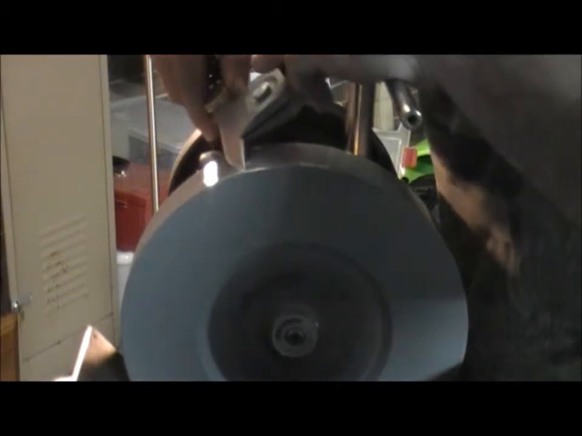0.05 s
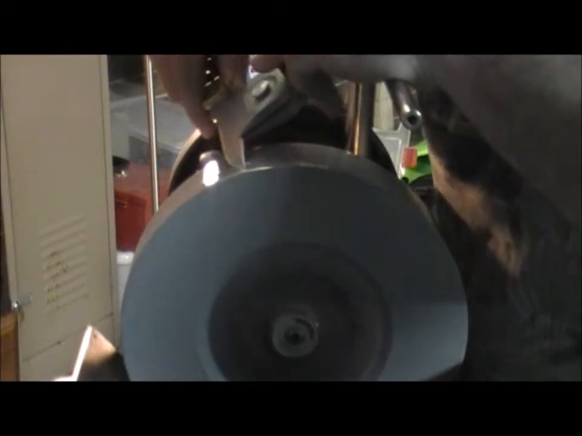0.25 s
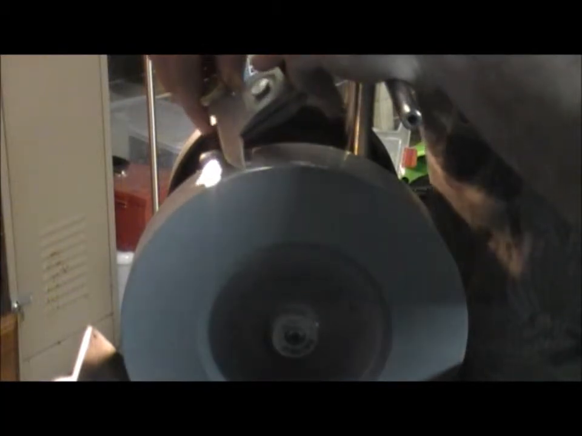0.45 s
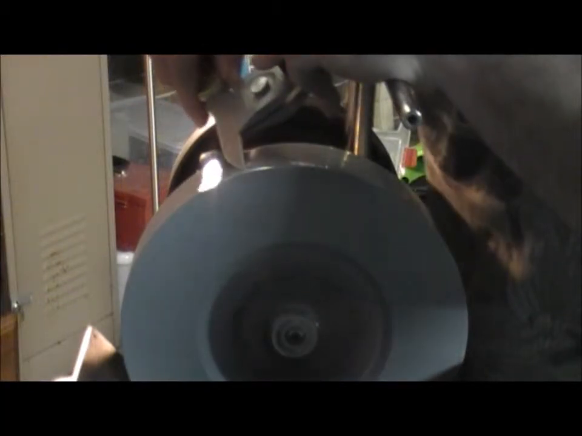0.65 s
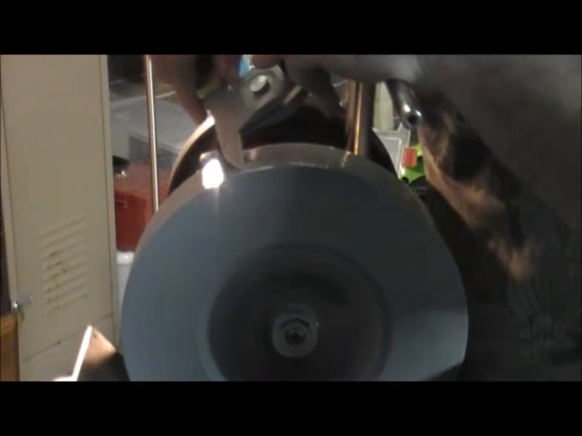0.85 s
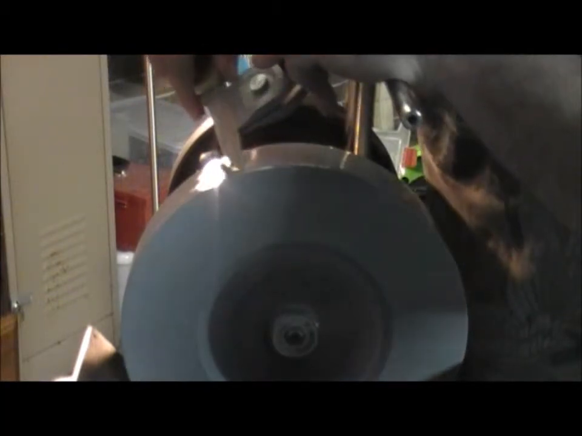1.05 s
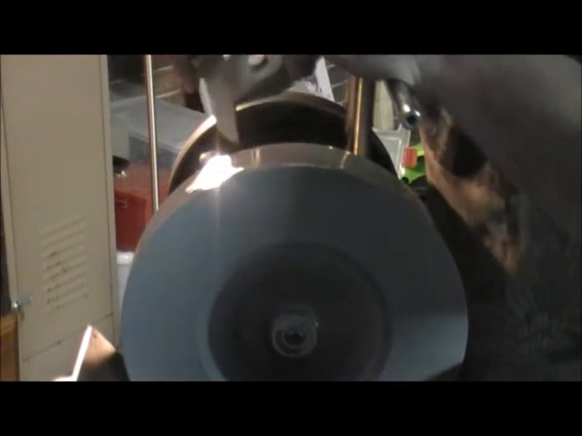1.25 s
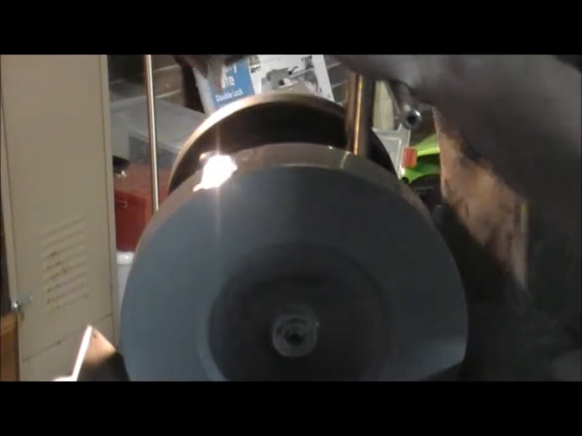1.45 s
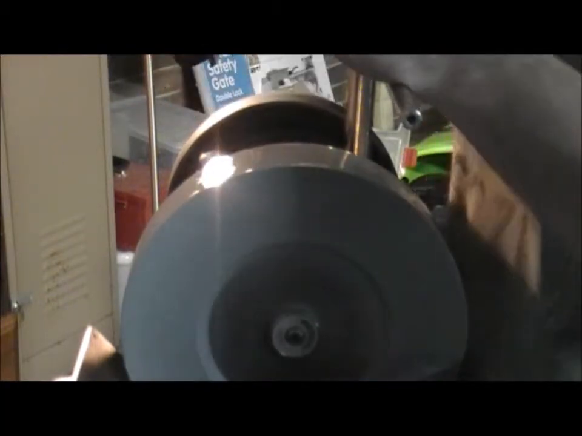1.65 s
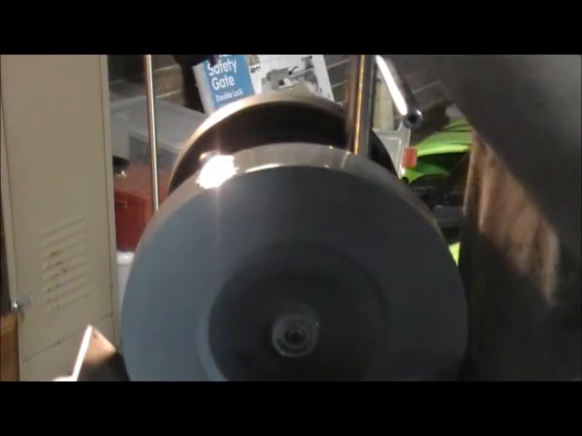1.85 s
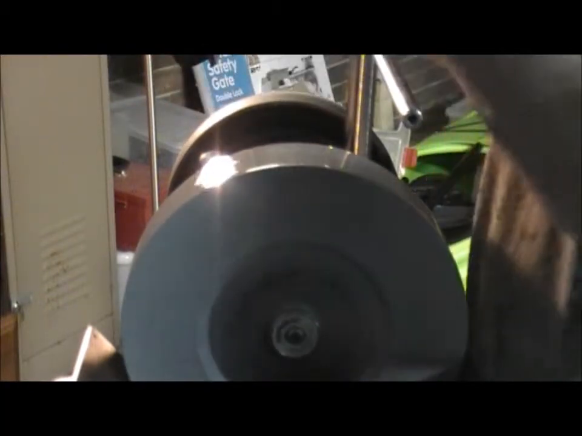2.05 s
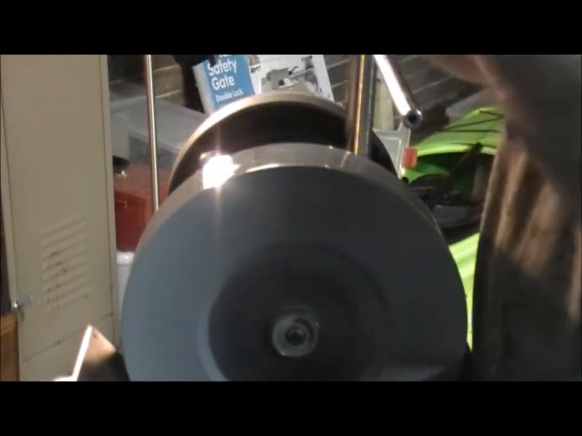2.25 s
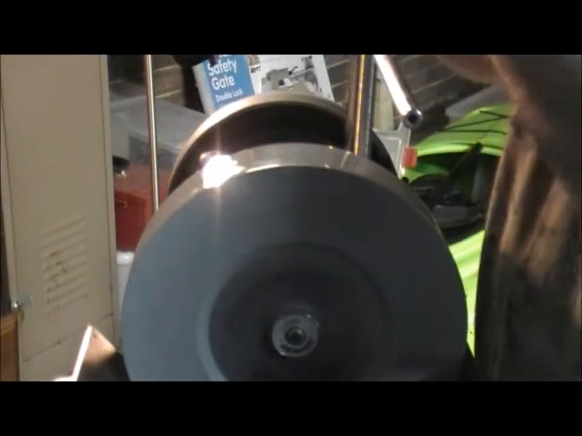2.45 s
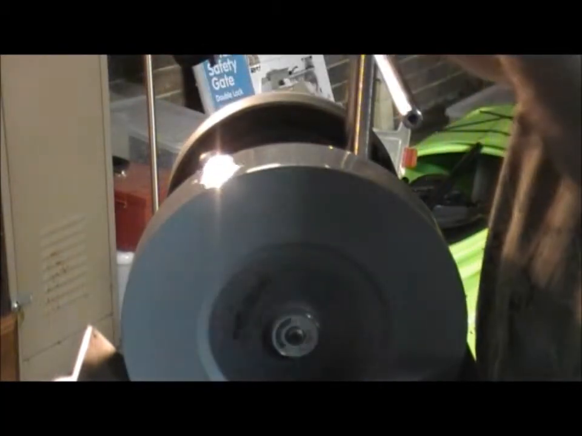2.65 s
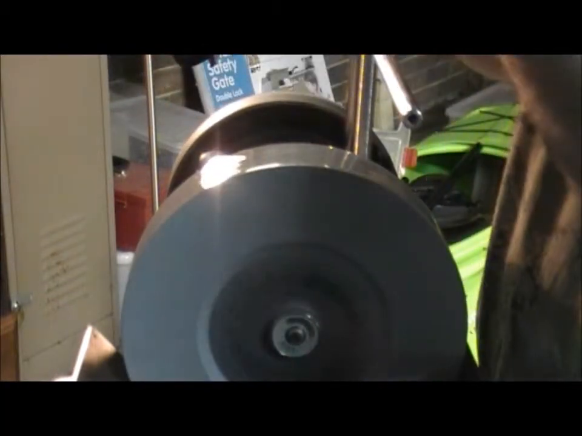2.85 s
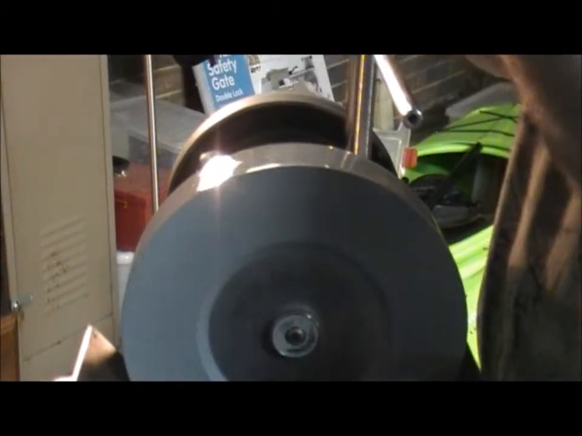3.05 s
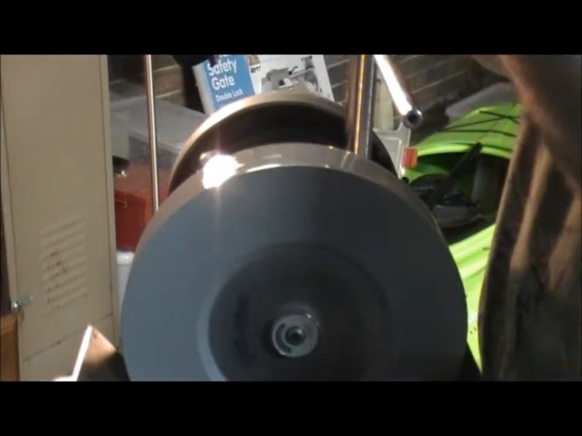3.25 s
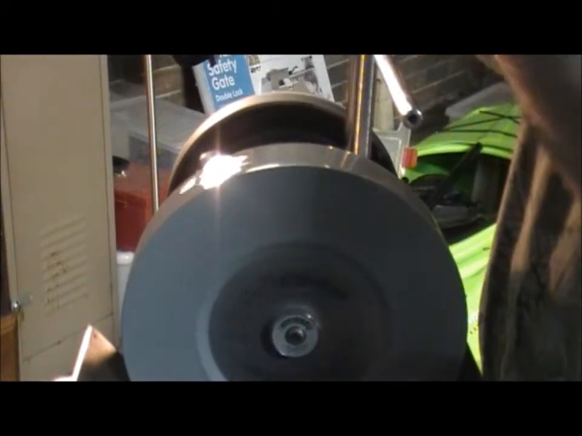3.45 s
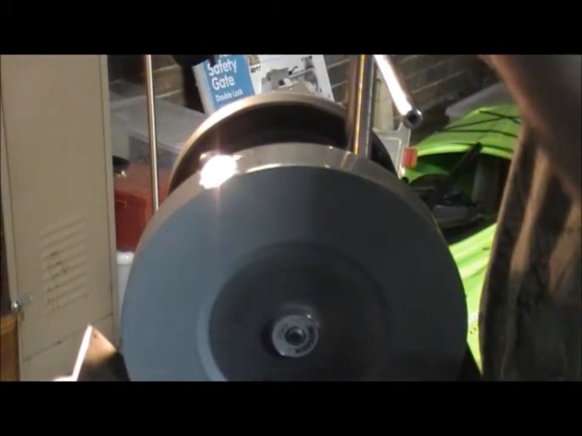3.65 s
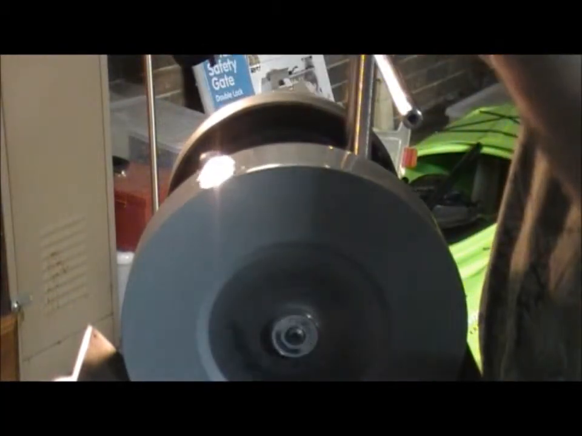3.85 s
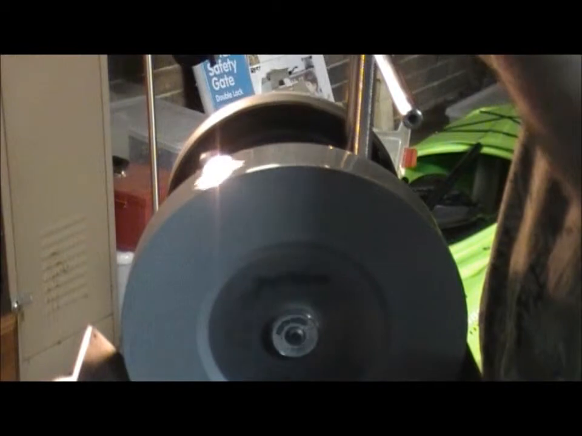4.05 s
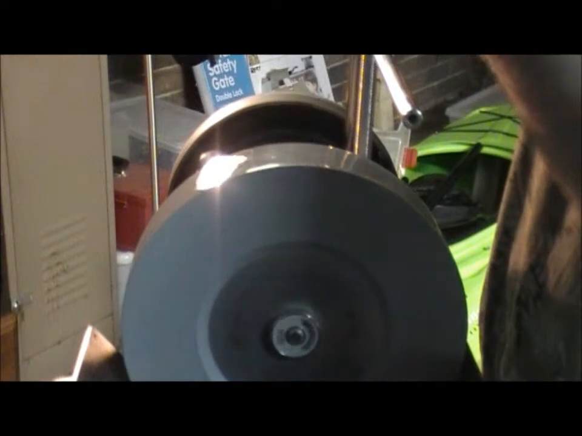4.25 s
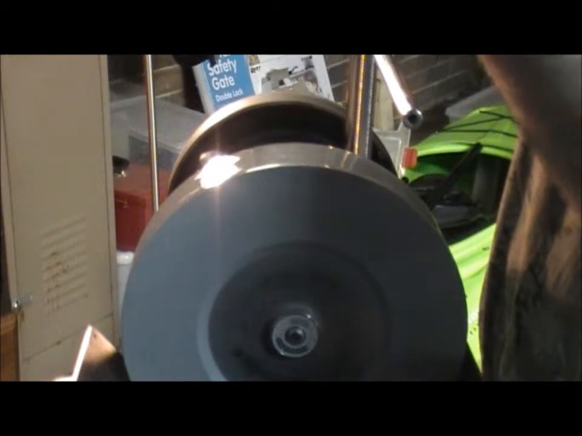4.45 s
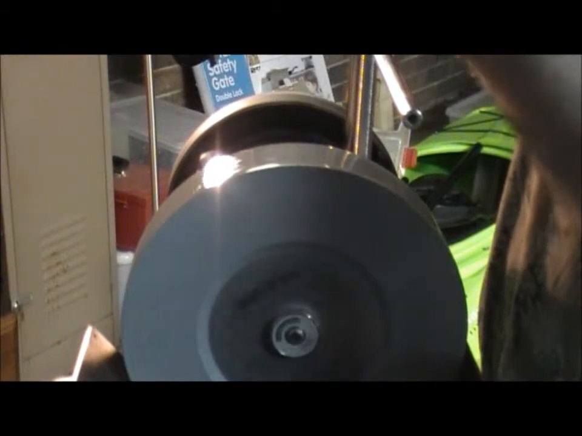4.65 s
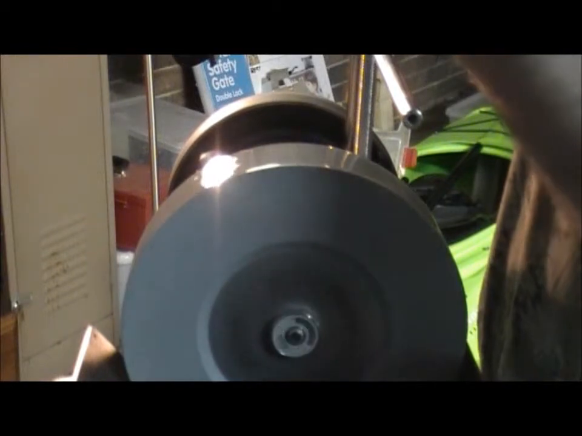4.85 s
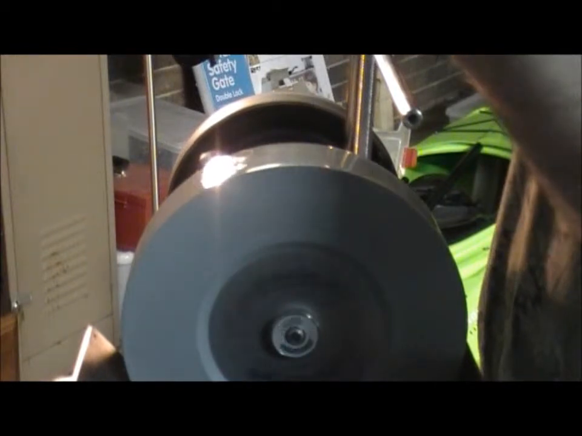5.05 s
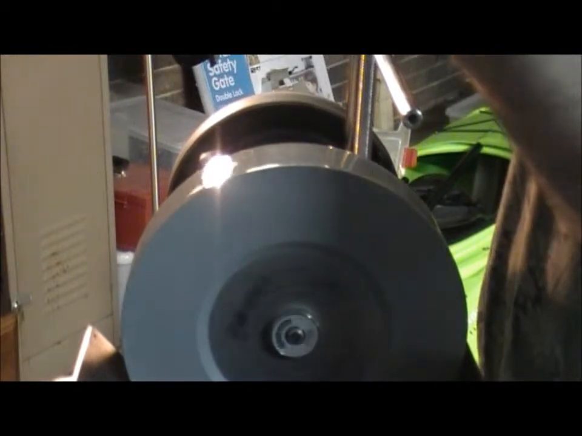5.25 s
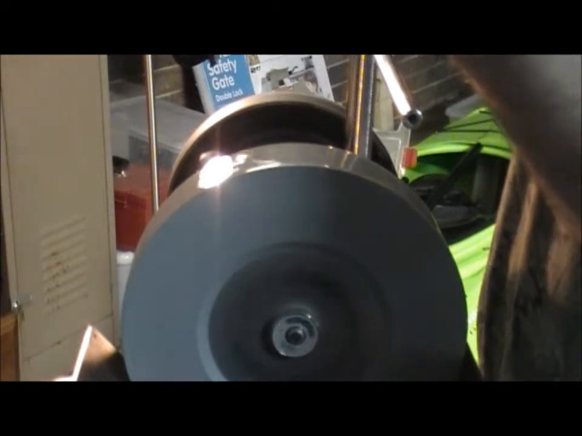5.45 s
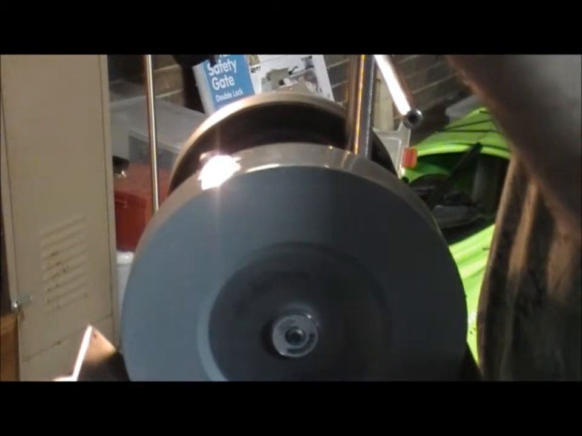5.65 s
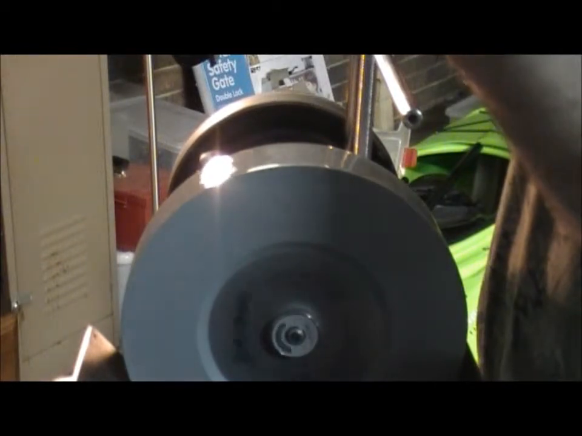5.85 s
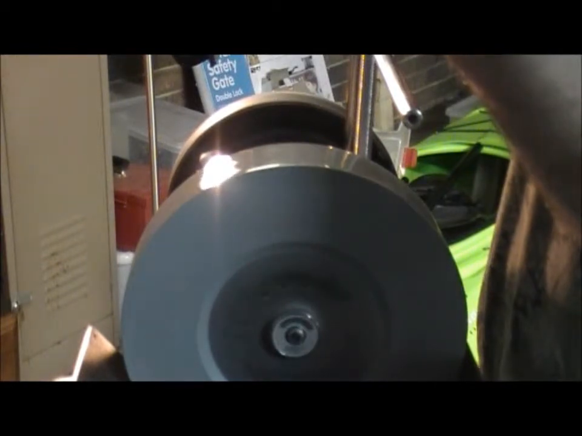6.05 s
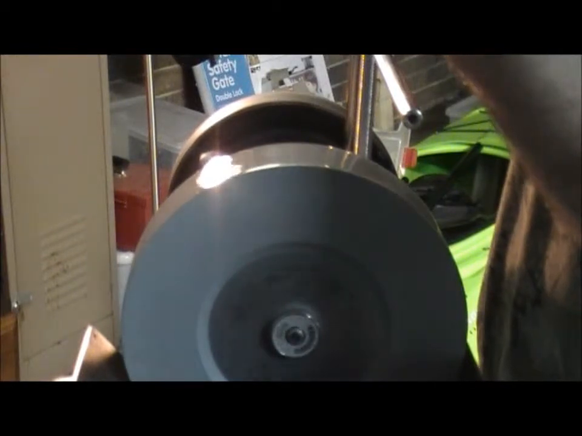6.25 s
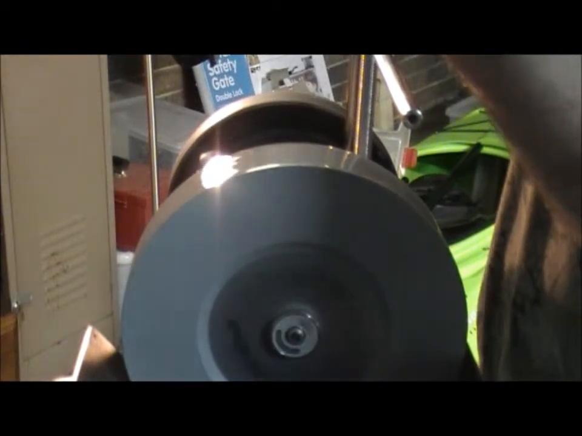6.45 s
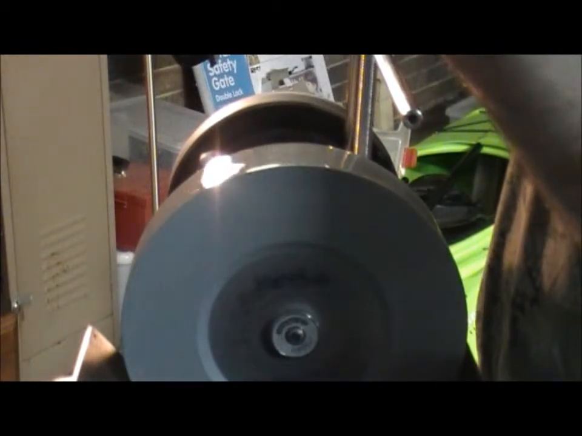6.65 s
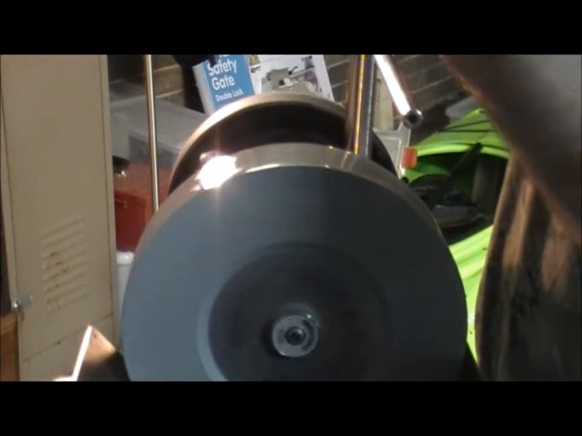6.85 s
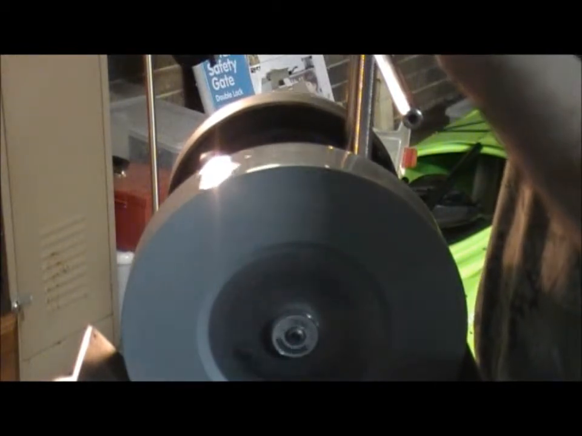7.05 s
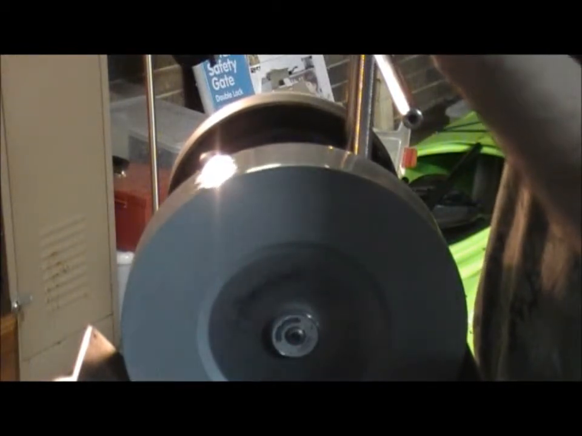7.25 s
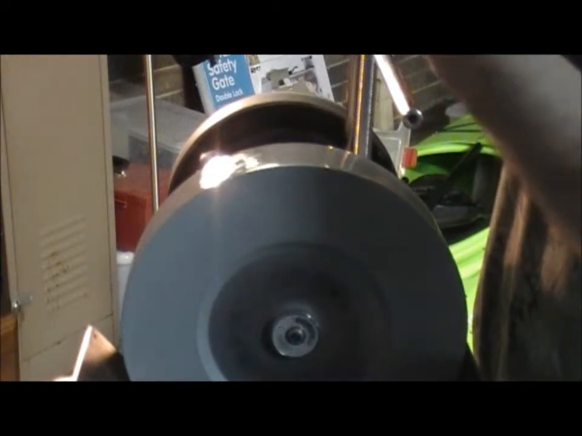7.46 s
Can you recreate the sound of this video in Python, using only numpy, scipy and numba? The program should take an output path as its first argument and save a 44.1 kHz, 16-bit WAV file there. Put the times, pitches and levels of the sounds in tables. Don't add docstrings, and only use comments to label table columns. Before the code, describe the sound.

A steel blade squeals piercingly on a grinding wheel for about a second, lifts with a brief ring, then the motor hums on with tiny wet clicks.

```python
import sys
import numpy as np
from scipy import signal
from scipy.fft import rfft, irfft, next_fast_len
from scipy.io import wavfile
from scipy.ndimage import uniform_filter1d, minimum_filter1d
from numba import njit

SR = 44100
rng = np.random.default_rng(int(sys.argv[2]) if len(sys.argv) > 2 else 0)


def master_out(mix):
    frames = np.transpose(np.atleast_2d(mix))
    ceiling = np.clip(frames, -1, 1)
    pcm = np.round(ceiling * 32767).astype(np.int16)
    wavfile.write(sys.argv[1], SR, pcm)


def makeup_ratio(level_db):
    decades = np.asarray(level_db, float) / 20
    return 10 ** decades


N = 331632
T = np.arange(N) / SR


def curves(table):
    s, *columns = np.transpose(table)
    return [np.interp(T, s, c) for c in columns]


def level(x, db):
    return x * makeup_ratio(db) / np.sqrt(np.mean(x ** 2))


def pan(x, db):
    return x * makeup_ratio(np.array([db + 0 * T, -db + 0 * T]) / 2)


def walk(rate):
    held = np.repeat(rng.standard_normal(int(N / SR * rate) + 2), 8)
    smooth = uniform_filter1d(uniform_filter1d(held, 8), 8)
    return np.interp(T * rate * 8, np.arange(len(held)), 1.3 * smooth)


def shaped(x, table=(), modes=(), order=1):
    size = next_fast_len(N + SR)
    f = np.arange(size // 2 + 1) * SR / size + 1e-3
    gain = 0
    if table:
        points = np.array(table)
        gain = makeup_ratio(np.interp(np.log(f), np.log(points[:, 0]), points[:, 1]))
    for hz, width, db in modes:
        gain = gain + makeup_ratio(db) / (1 + 2j * (f - hz) / (width * order)) ** order
    return irfft(rfft(x, size) * gain, size)[..., :N]


def wide(side):
    mid, diff = rng.standard_normal((2, N))
    return np.array([mid + side * diff, mid - side * diff])


def squeal(squeal_db):
    # time in seconds, squeal in Hz, left minus right in dB.
    slide = [
        (0.0, 8295, -7),
        (0.086, 8256, 5),
        (0.224, 8183, -3),
        (0.234, 8167, 2.5),
        (0.332, 8184, -8),
        (0.438, 8232, 6),
        (0.5, 8201, 1.5),
        (0.96, 8224, 3),
        (1.17, 8310, -11.5),
    ]
    # time in seconds, depth in dB, length in seconds.
    slips = [(0.039, 8.5, 0.0091), (0.067, 14.5, 0.015), (0.085, 5.5, 0.011), (0.111, 4.5, 0.0077),
             (0.157, 3.5, 0.021), (0.193, 8.5, 0.0067), (0.227, 6.5, 0.011), (0.258, 2, 0.01),
             (0.294, 3.5, 0.023), (0.367, 5, 0.0097), (0.383, 3.5, 0.007), (0.438, 10.5, 0.014),
             (0.52, 5, 0.011), (0.578, 4, 0.011), (0.629, 7, 0.0081), (0.658, 6, 0.006), (0.748, 4, 0.022),
             (0.808, 3.5, 0.032), (0.898, 10.5, 0.0078), (0.913, 7, 0.0045), (0.97, 3.5, 0.036),
             (1.031, 11, 0.0034), (1.043, 12, 0.0028), (1.06, 9, 0.0054), (1.068, 10, 0.0024),
             (1.074, 5, 0.03), (1.09, 22, 0.0046), (1.116, 3.5, 0.025), (1.132, 6, 0.0099),
             (1.152, 9.5, 0.0071)]
    hz, pan_db = curves(slide)
    pan_db = pan_db + 2 * walk(25)
    dip_db = sum(1.44 * db / (1 + ((T - s) / (0.44 * length)) ** 2) for s, db, length in slips)
    ragged = np.interp(T, [0, .1, 1.02, 1.06], [0.4, 0.072, 0.14, 0.54])
    phase = np.cumsum(2 * np.pi * (hz + 5 * walk(29.83) + 90 * ragged * walk(200)) / SR)
    lead = .27 * walk(14)
    loudness = makeup_ratio(squeal_db - dip_db + 5.8 * ragged * walk(200))
    both = np.sqrt(2) * np.sin([phase + lead, phase - lead]) * loudness
    return pan(both, pan_db), phase


def grit(grit_db, lifted):
    # pitch in Hz, width in Hz, level in dB.
    steel = [(2880, 70, -46), (3880, 39, -50), (4540, 57, -50), (5430, 170, -45), (5860, 75, -43),
             (6140, 68, -42), (7350, 120, -27), (8210, 34, 0), (9490, 47, -41), (10000, 170, -40),
             (10700, 130, -51)]
    # frequency in Hz, level in dB per Hz.
    scrape_colour = [(100, -37), (250, -32.5), (900, -35.5), (2000, -43), (3350, -38.5), (4000, -40),
                     (5000, -38.5), (6600, -30), (7700, -14.5), (8150, -10), (8700, -19.5), (9600, -28.5),
                     (11200, -53), (14000, -75)]
    grains = makeup_ratio(2.5 * walk(500) + 0.47 * walk(40))
    ring_db = grit_db - 1.5 + 3.0 * walk(19.6) - 8 * np.minimum(3 * lifted, 1)
    ring = shaped(wide(0.3) * grains, modes=steel[6:7], order=2)
    modes = shaped(wide(0.12) * grains, modes=steel[1:6] + steel[8:], order=2)
    scrape = level(modes, -8.0) + level(shaped(wide(0.44) * grains, scrape_colour), 2.8)
    skate = shaped(wide(0.27) * grains, [(3000, -16.5), (5500, -3.0), (10500, -3), (14000, -15), (16000, -20.0)])
    skate = level(skate, -5) * makeup_ratio(grit_db + 6 * np.minimum(grit_db + 30.5, 0))
    return level(ring, 0) * makeup_ratio(ring_db) + scrape * makeup_ratio(grit_db), skate


def low_mode(lifted):
    hz = 2870 - 600 * lifted
    db = -48 - 7 * T + 14 * np.sin(3.2 * lifted)
    return np.sin(np.cumsum(2 * np.pi * (hz + 35 * walk(300)) / SR)) * makeup_ratio(db + 2.9 * walk(150))


def free_ring(phase, freed_s):
    t60_s, beat_hz = 0.5, 42.5
    free = np.maximum(T - freed_s, 0)
    beat = 1 + 0.52 * np.cos(2 * np.pi * beat_hz * free)
    return np.sin(phase) * beat * makeup_ratio(-26 - 60 * free / t60_s) * np.minimum(free / .02, 1)


def blade():
    # time in seconds, squeal in dB, grit in dB.
    edge = [
        (0, -6.5, -19),
        (.06, -1, -25),
        (.12, -5.5, -31),
        (.32, -8, -32.5),
        (1.02, -8, -33),
        (1.034, -11.5, -36),
        (1.142, -14, -29.5),
        (1.17, -32.5, -31),
        (1.2, -42, -41),
    ]
    lift_s, off_s = 1.095, 1.2
    squeal_db, grit_db = curves(edge)
    lifted = np.clip((T - lift_s) / (off_s - lift_s), 0, 1)
    touch = np.clip((off_s - T) / 0.032, 0, 1)
    cry, phase = squeal(squeal_db)
    scrape, skate = grit(grit_db, lifted)
    steady = cry + scrape + low_mode(lifted)
    steady = shaped(steady * touch, [(11200, 0), (11900, -30), (16000, -45)])
    return steady + free_ring(phase, edge[-2][0]) + skate * touch


def tone(hz, db, pan_db, wobble_db, drift):
    phase = 2 * np.pi * (hz * T + rng.random()) + drift * walk(4)
    lead = min(hz / 3600.0, .15) * rng.standard_normal()
    slow = np.exp(1j * phase[::48]) * makeup_ratio(wobble_db * walk(9)[::48])
    turning = np.outer(slow, np.exp(2j * np.pi * hz * T[:48])).ravel()[:N]
    ears = np.exp(1j * np.array([[lead], [-lead]])) * makeup_ratio(db + np.array([[pan_db], [-pan_db]]) / 2)
    return np.sqrt(2) * (turning * ears).imag


def motor():
    # pitch in Hz, level in dB rms, left minus right in dB, throb rate in Hz,
    # throb depth from 0 to 1, time of a throb peak in seconds.
    hum = [(100.0, -33.9, 0.6, 0.72, 0.04, 0.65), (200.0, -38.5, 0.8, 1.54, 0.2, 0.45),
           (300.0, -46.6, -0.5, 2.11, 0.14, 0.43), (397.8, -47.2, -2.0, 3.09, 0.24, 0.01),
           (598.7, -51.2, 0.3, 2.15, 0.4, 0.12), (659.9, -45.9, 0.8, 0.55, 0.53, 1.8),
           (770.3, -56.1, 1.9, 0.61, 0.15, 0.6), (795.8, -57.4, -2.3, 2.13, 0.13, 0.22),
           (1093.7, -50.0, -0.8, 0.5, 0.1, 0.01), (1403.0, -56.4, 0.7, 1.09, 0.09, 0.28),
           (1419.7, -56.7, 0.9, 1.1, 0.09, 0.34), (1445.4, -56.6, 2.6, 2.68, 0.09, 0.36),
           (1591.9, -56.1, 1.2, 0.47, 0.15, 1.44)]
    load_db = {100: -5, 300: -3, 398: 5.5}
    unload_s, fall_s, recover_s = 1.234, 0.06, 0.16
    since = T - unload_s
    low_db = -30 * np.exp(np.where(since < 0, since / fall_s, -since / recover_s))
    out = 0
    for k, (hz, db, pan_db, rate, depth, peak) in enumerate(hum):
        throb = 1 + np.clip(0.95 * depth, 0, 1) * np.cos(2 * np.pi * rate * (T - peak))
        throb = throb * makeup_ratio(load_db.get(round(hz), 0) * (T < 1.1))
        if k == 0:
            throb = throb * makeup_ratio(low_db)
        out = out + tone(hz, db, pan_db, 0.64 + 0.38 * (k > 1), hz / 4600.0) * throb
    return out


def casing():
    # pitch in Hz, width in Hz, level in dB.
    resonances = [(69.5, 7.4, 9), (650, 27, -10), (1104, 4, -1.5), (1229, 18, -1.5), (1464, 65, -1.5),
                  (1563, 70, -5.5), (1984, 69, -3), (2905, 350, -14.5), (3833, 48, 3.5), (4040, 110, -3),
                  (4550, 21, -2.5), (4920, 45, -4), (5350, 15.4, 1), (6340, 67, -7), (6960, 138, -2),
                  (7300, 71, -3.5)]
    # frequency in Hz, level in dB per Hz.
    shop_colour = [(15, -62), (25, -26), (102, -4.5), (150, -10), (199, -6), (251, -13.5), (397, -13),
                   (452, -14), (663, -11), (974, -16), (3420, -22.5), (3880, -19.5), (4530, -20),
                   (7180, -22.5), (11400, -50.5), (14800, -88), (22000, -120)]
    # first tone in Hz, level in dB rms,
    # dB per further tooth, number of teeth, left minus right in dB.
    combs = [(3803.3, -53, 0, 3, 4), (3793.4, -53, -4, 3, 2), (3869.1, -57, -1.3, 4, 1),
             (4113.9, -55, -5, 2, 3)]
    # pitch in Hz, level in dB rms, left minus right in dB.
    side_tones = [(2090.3, -63, 2), (2791.0, -65, 0), (2814.5, -59, 4), (2864.1, -61, 0), (3693.0, -61, 2),
                  (3787.3, -57, 1), (3813.6, -56, 3), (3850.2, -60, 7), (3994.4, -59, 0), (4079.7, -58, 0),
                  (4099.8, -61, 2), (4213.8, -63, 4), (4353.0, -62, -1), (5427.8, -64, 2)]
    ball_hz, cage_hz, shaft_hz = 110.0, 15.72, 24.87
    balls = np.exp(-(ball_hz * T % 1) / 0.95)
    cage = 1 + 0.076 * np.cos(2 * np.pi * cage_hz * T)
    shaft = 1 + 0.13 * np.cos(2 * np.pi * shaft_hz * T)
    gate = balls * cage * shaft
    rattle = shaped(wide(0.1) * gate * makeup_ratio(0.91 * walk(40)), modes=resonances)
    rattle = shaped(rattle, [(7800, 8), (9000, -17.5), (16000, -33.5)])
    teeth = [(hz + k * ball_hz, db + k * step, pan_db)
             for hz, db, step, count, pan_db in combs for k in range(count)]
    lines = sum(tone(hz, db + .5, pan_db, 1.9, 0.82) for hz, db, pan_db in teeth + side_tones)
    lines = lines * (gate + 0.73) / np.sqrt(np.mean((gate + 0.82) ** 2))
    broad = shaped(wide(0.42) * (gate + 1.6), shop_colour)
    film = shaped(wide(0.72) * makeup_ratio(2.0 * walk(60)),
                  [(7000, -18.0), (9500, 5.0), (12500, -2.0), (13800, 6.5), (14800, -14), (16000, -22.5)])
    return level(rattle, -42) + level(film, -60) + lines + level(broad, -38)


def drop_rows():
    # time in seconds, peak in dB, pitch in Hz, spread in Hz.
    drops = [(1.573, -35, 7600, 3100), (1.9434, -34, 8100, 2400), (2.6133, -37, 8800, 1700),
             (2.633, -36, 11300, 1700), (2.6975, -23, 7560, 1700), (2.8567, -37, 8300, 2300),
             (3.3218, -32.5, 7600, 2300), (3.3959, -34.5, 8000, 2100), (3.446, -34.5, 8650, 1300),
             (3.5408, -35, 8600, 1000), (3.6373, -30.5, 7950, 2700), (3.7135, -37, 10500, 1600),
             (3.8927, -37, 7200, 3300), (4.4437, -36, 9550, 2000), (4.4543, -35, 7500, 1900),
             (4.662, -29.5, 7260, 2700), (4.6985, -38.5, 7100, 2400), (4.9214, -36, 8000, 2200),
             (5.0773, -28, 10100, 1900), (5.0947, -22.5, 7370, 1300), (5.321, -29, 7240, 1590),
             (5.325, -26.5, 5900, 1300), (5.7007, -38.5, 6900, 2700), (5.9572, -36, 7800, 1700),
             (5.9782, -38, 8200, 1500), (6.2884, -32.5, 7100, 3500), (6.6518, -35.5, 8700, 1600),
             (6.7605, -37, 8060, 2800), (7.0215, -32, 8600, 3900), (7.1669, -35, 7900, 1700)]
    # first time in seconds, peak in dB,
    # pitch in Hz, spread in Hz.
    nicks = [
        (1.4044, -32.5, 8000, 2300),
        (1.5069, -38, 8200, 2000),
    ]
    turn_s, splash_lag_s = .6495, 0.0029
    loose = np.array(drops)
    after = [loose + [k * splash_lag_s, -4.5 - 4 * k, 500 * k, 400] for k in (1, 2)]
    turns = np.arange(int(N / SR / turn_s) - 1)[:, None]
    rim = []
    for nick in nicks:
        scatter = rng.standard_normal((len(turns), 4)) * [0.00089, 2.0, 470, 400]
        rim.append(np.array(nick) + turns * [turn_s, 0, 0, 0] + scatter)
    chance = rng.random((730, 4))
    spray = np.c_[chance[:, 0] * N / SR, -64 - 3.1 * np.log(chance[:, 1]),
                  7500 + 5000 * chance[:, 2], 1000 + 3000 * chance[:, 3]]
    spray[:30, 1] = -43.5 + 6.7 * chance[:30, 1]
    spray[:30, 2] -= 1500 * chance[:30, 2]
    rows = np.vstack([loose, *after, *rim, spray])
    return np.c_[rows, 1.8 * rng.standard_normal(len(rows))]


def water():
    out, t = np.zeros((2, N + 300)), T[:300]
    for s, db, hz, width, pan_db in drop_rows():
        swell = t * width * np.exp(1 - t * width * 1.92) * 1.67
        ring = np.sin(2 * np.pi * hz * t * (1 + 15 * t)) * swell
        crack = (.06 + width / 12000.0) * np.diff(rng.standard_normal(302), 2) * np.exp(-t / 0.0027)
        i = int((s - .0003) * SR) % N
        out[:, i:i + 300] += makeup_ratio(db + 2.2 + np.array([[pan_db], [-pan_db]]) / 2) * (ring + crack)
    return shaped(out[:, :N], [(3000, -10), (6000, 5.0), (10000, 0.5), (13000, -5.5), (16000, -7)])


@njit
def walls(x, lags, gain):
    line, tap, out = np.zeros((8, 4096)), np.zeros(8), np.zeros((2, len(x)))
    for i in range(len(x)):
        total = 0.
        for k in range(8):
            tap[k] = gain[k] * line[k, (i - lags[k]) & 4095]
            total += tap[k]
            out[k % 2, i] += tap[k]
        for k in range(8):
            line[k, i & 4095] = x[i] + tap[k] - total / 4
    return out


def room(x, gain_db):
    t60_s = 0.36
    lags = rng.integers(500, 2400, 8)
    left, right = walls(x.mean(0), lags, makeup_ratio(-60 * lags / SR / t60_s))
    lift = makeup_ratio(np.clip(0.8 * (gain_db + 24), 0, 7.5))
    front = makeup_ratio(-24) * lift * (left + right)
    sides = makeup_ratio(-25) * lift * (left - right)
    return np.array([front + sides, front - sides])


def scene():
    # time in seconds, gain in dB.
    recorder_gain = [
        (0, 3.5),
        (.1, -14.5),
        (1.04, -17.5),
        (1.12, -14),
        (1.28, -9),
        (1.44, -3.5),
        (1.75, -2),
        (2.4, -0.8),
        (3.0, 0.5),
    ]
    gain_db, = curves(recorder_gain)
    steel = blade()
    machine = makeup_ratio(gain_db) * (motor() + casing())
    drops = water() * (T > 1.3) * makeup_ratio(gain_db)
    return machine + drops + steel + room(steel + drops, gain_db)


def limiter_ticks():
    # time in seconds, peak in dB.
    jumps = [
        (0.1224, -37.5),
        (0.3142, -35),
        (0.404, -36),
        (0.5452, -33),
        (0.6399, -38),
        (0.7696, -37.5),
        (0.8564, -40),
    ]
    ticks = np.zeros(N)
    for s, db in jumps:
        i = int(s * SR)
        ticks[i:i + 90] = makeup_ratio(db + 8.0) * rng.standard_normal(90) * np.exp(-T[:90] / 0.00067)
    return uniform_filter1d(ticks, size=3)


def low_pass(x):
    return signal.sosfilt(signal.butter(12, 15800, fs=SR, output="sos"), x)


def record(dry):
    # frequency in Hz, level in dB.
    mic = [(20, -11), (60, -0.5), (9500, 0.5), (11500, -2.5), (13000, -6), (14500, -15), (16000, -28)]
    heard = np.tanh(.45 * shaped(dry + limiter_ticks(), mic)) / .45
    room_left = minimum_filter1d(.96 / np.maximum(np.abs(heard).max(0), .96), size=441)
    heard = heard * uniform_filter1d(room_left, size=221)
    return low_pass(heard)


dry = scene()
out = record(dry)
master_out(out)
```